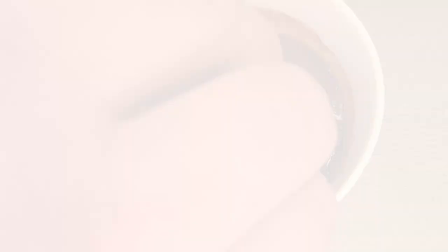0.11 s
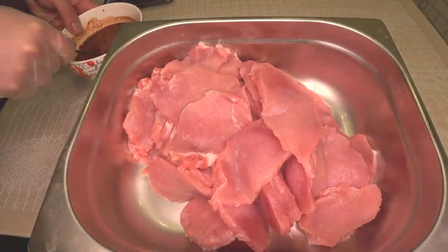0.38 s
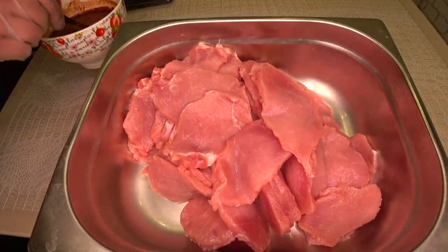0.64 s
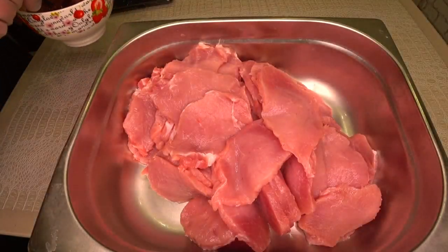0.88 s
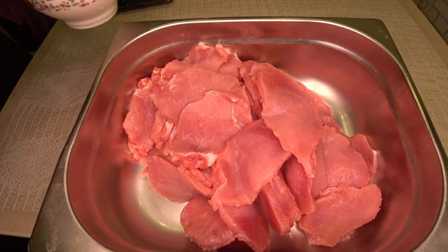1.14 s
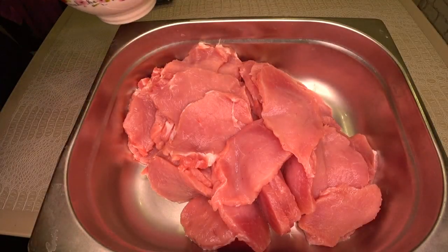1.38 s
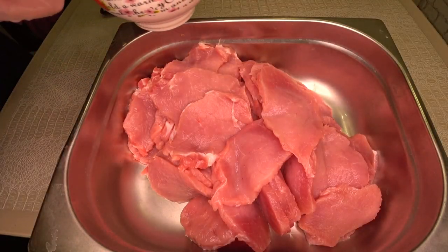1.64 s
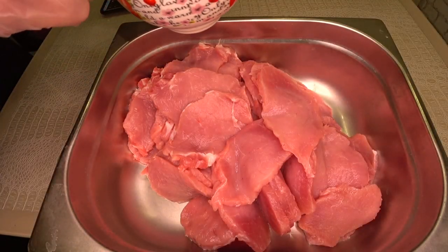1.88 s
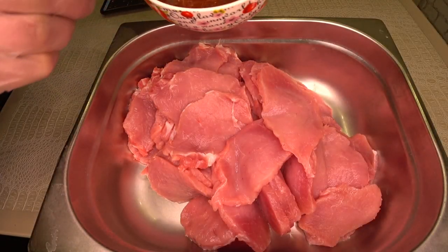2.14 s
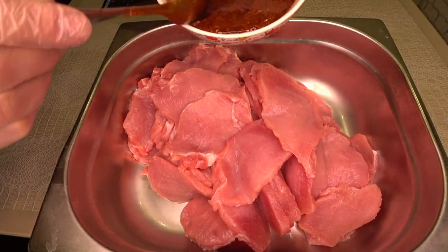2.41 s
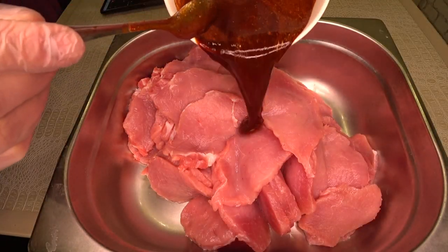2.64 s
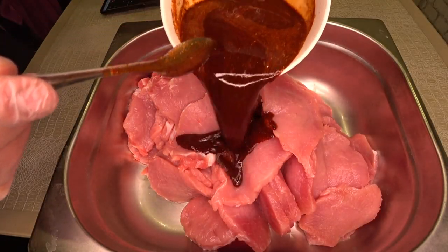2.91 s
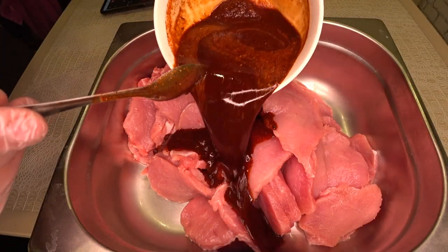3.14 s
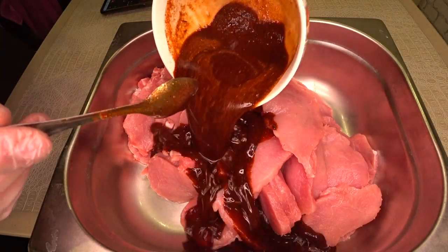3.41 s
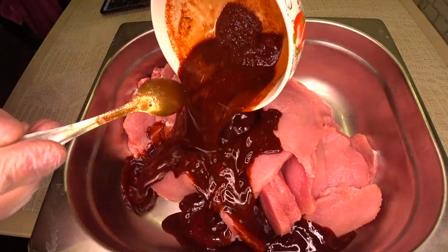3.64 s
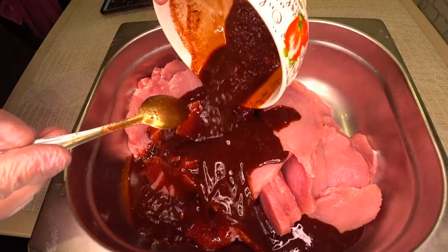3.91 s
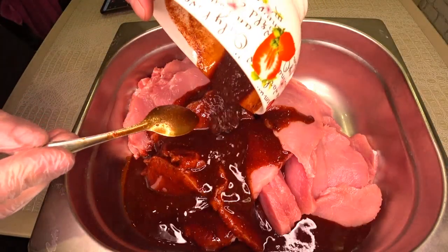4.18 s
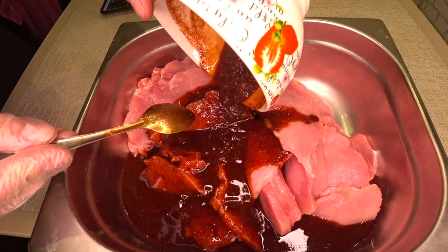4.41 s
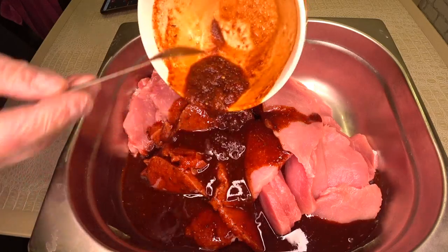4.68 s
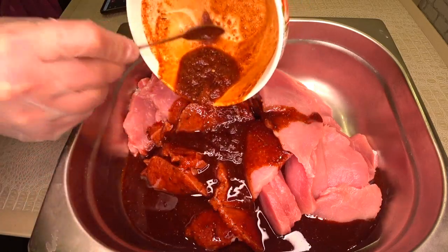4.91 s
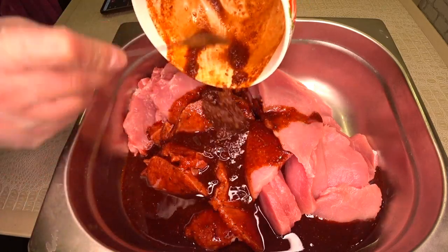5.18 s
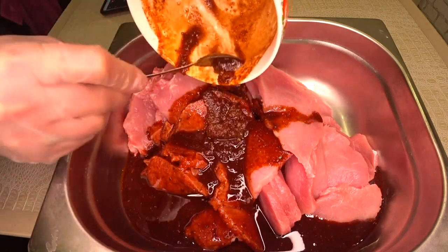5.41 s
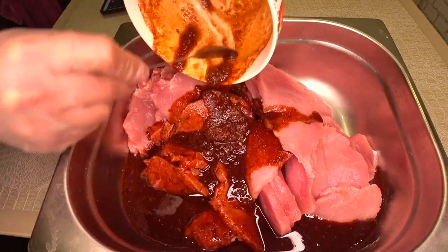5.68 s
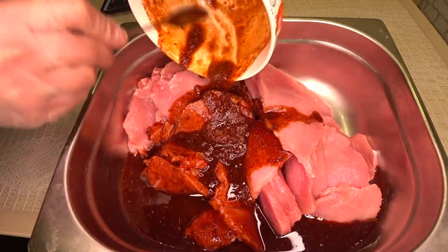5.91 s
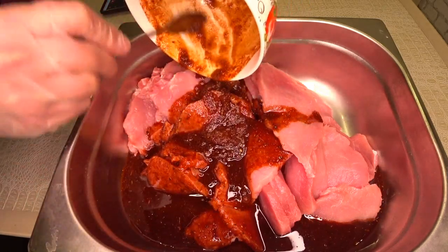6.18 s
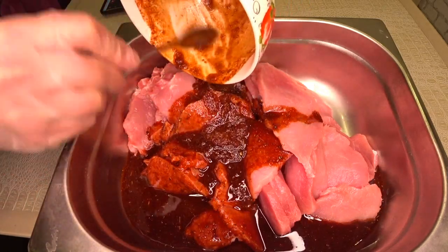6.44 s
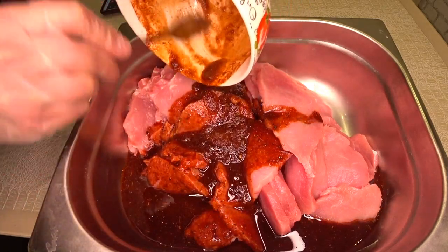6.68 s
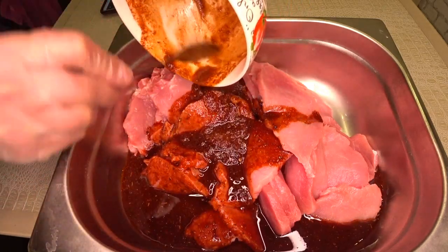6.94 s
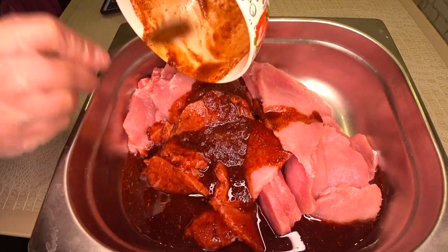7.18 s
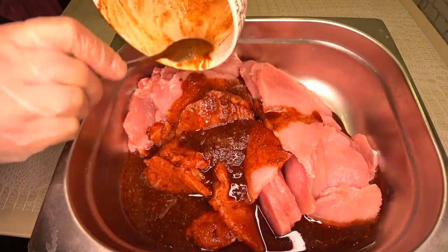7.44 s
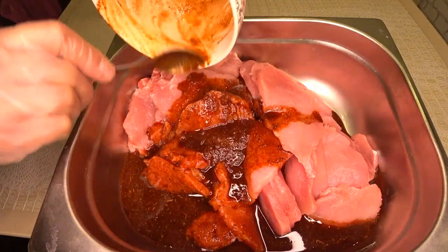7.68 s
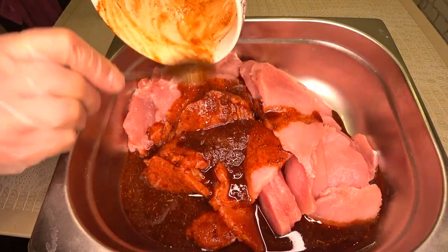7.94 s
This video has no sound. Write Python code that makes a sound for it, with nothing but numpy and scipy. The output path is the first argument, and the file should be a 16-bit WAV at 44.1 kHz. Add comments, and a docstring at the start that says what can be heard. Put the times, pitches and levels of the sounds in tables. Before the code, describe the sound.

Close wet stirring and sauce drips over raw meat, followed by brisk rhythmic spoon scrapes and clinks on a ceramic bowl, with a fan humming behind.

```python
"""A spoon scrapes a ceramic bowl: cracks, decaying modes and rasping slip noise, most strokes opening with a tap.
Before that, a bowl is set down on a kitchen counter (noise clunk, short rings), a spoon stirs it, and thick
sauce pours and drips over meat in a steel tray (gliding bubbles, wet noise, crackle).
A fan (coloured noise, wavering tones) hums in a small hard room; the sound fades out and in at the start."""
import sys
import numpy as np
from scipy import signal
from scipy.fft import rfft, irfft, next_fast_len
from scipy.io import wavfile
from scipy.ndimage import uniform_filter1d

SR = 44100
rng = np.random.default_rng(int(sys.argv[2]) if len(sys.argv) > 2 else 0)


def elevation(decibels):
    """Turn decibel levels (scalar or array-like) into linear amplitude ratios."""
    levels = np.asarray(decibels, float)
    return 10 ** (levels / 20)


def unload_audio(sound):
    """Save the sound as a 16-bit wav file, at the path given as the first command line argument."""
    columns = np.transpose(np.atleast_2d(sound))
    # keep every value between -1 and 1, then stretch to whole-number steps
    steps = np.round(np.clip(columns, -1, 1) * 32767)
    wavfile.write(sys.argv[1], SR, steps.astype(np.int16))


N = 355887


def evened(x):
    """Scales to rms 1."""
    return x / np.sqrt(np.mean(x ** 2) + 1e-20)


def read(points, hz):
    """Reads a (frequency, value) table on a log frequency axis."""
    f, value = np.transpose(points)
    return np.interp(np.log(hz + 1), np.log(f + 1), value)


def curve(rows):
    """Gain over the whole scene from (time, level) rows; -120 dB outside."""
    return elevation(np.interp(np.arange(N) / SR, *np.transpose(rows), -120, -120))


def add(mix, start_s, sound, pan_db=0):
    """Mixes a mono sound into both channels; pan_db is left over right."""
    part = mix[:, round(start_s * SR):][:, :len(sound)]
    part += sound[:part.shape[1]] * elevation(np.array([[pan_db / 2], [-pan_db / 2]]))


def coloured(x, points):
    """Filters by a (frequency, level) spectrum; rms 1."""
    length = x.shape[-1]
    size = next_fast_len(length)
    gain = elevation(read(points, np.fft.rfftfreq(size, 1 / SR)))
    return evened(irfft(rfft(x, size) * gain, size)[..., :length])


def resonate(x, hz, width_hz):
    """One resonance at a fixed or gliding pitch: shift to zero, low-pass, shift back."""
    turn = np.exp(2j * np.pi * np.cumsum(hz * np.ones(len(x))) / SR)
    r = np.exp(-np.pi * width_hz / SR)
    return 2 * (turn * signal.lfilter([1 - r], [1, -r], x / turn)).real


def patchy(x, patch_db):
    """Chance patches of loud and soft over time and pitch; rms 1."""
    z = signal.stft(x, nperseg=128)[2]
    field = uniform_filter1d(rng.standard_normal(z.shape), size=4, axis=0)
    field = uniform_filter1d(field, size=9, axis=1)
    return evened(signal.istft(z * elevation(patch_db * evened(field)), nperseg=128)[1][:len(x)])


def ring(modes, colour_db=0, spread=0.0034, luck_db=2.5):
    """Decaying modes, pitch and level a little off each blow; height and phase shake most at first."""
    hz, db, t60_s = np.transpose(modes)[:, :, None]
    t = np.arange(SR // 2) / SR
    chance = rng.standard_normal((len(modes), 2))
    turns = hz * (1 + spread * chance[:, :1]) * t
    shake = .08 + .36 * np.exp(-t / .06)
    smooth = SR // 100  # 10 ms
    wander = uniform_filter1d(rng.standard_normal((2, len(modes), len(t))), size=smooth)
    height, phase = shake * wander * np.sqrt(smooth)
    decay = elevation(db + colour_db + luck_db * chance[:, 1:] - 60 * t / t60_s)
    return (decay * (1 + height) * np.sin(2 * np.pi * turns + phase)).sum(0)


def crack(t60_s, low_db, corner_hz=2200, rise_s=0.00076):
    """Contact noise: a decaying burst above the corner, peak 1, plus one blunt click below it."""
    t = np.arange(2000) / SR
    burst = rng.standard_normal(len(t)) * elevation(-60 * t / t60_s) * np.minimum(t / rise_s, 1)
    click = np.pad(np.hanning(20), (100, len(t) - 120))
    high = signal.sosfilt(signal.butter(2, corner_hz, "high", fs=SR, output="sos"), burst)
    low = signal.sosfilt(signal.butter(2, corner_hz, "low", fs=SR, output="sos"), click)
    low = low - uniform_filter1d(low, size=85)  # removes deep bass
    return high / abs(high).max() + elevation(low_db) * low / abs(low).max()


def bubble(hz, cycles, rise=0.023):
    """A few cycles that swell, die away and glide upward as the pocket shrinks."""
    u = np.arange(1500) / SR * hz / max(cycles, 1)
    tone = np.sin(2 * np.pi * cycles * u * (1 + rise * u))
    return tone * np.tanh(22.0 * u) * np.exp(-3.2 * u ** 2.03)


def crackle(per_s, scatter_db):
    """Sparse clicks of chance sign, a few large; rms 1."""
    size = elevation(scatter_db * np.minimum(rng.exponential(1, N), 4)) * rng.standard_normal(N)
    return evened(size * (rng.random(N) < per_s / SR))


def wet_noise(length_s, db, start_hz, end_hz, width_hz, tone=0):
    """Patchy noise plus optional sine in a gliding resonance that opens fast, sags and closes."""
    u = np.linspace(0, 1, round(length_s * SR))
    hz = start_hz + (end_hz - start_hz) * u
    pocket = resonate(resonate(rng.standard_normal(len(u)), hz, width_hz), hz, width_hz)
    pocket = patchy(pocket, 5.3) + tone * np.sin(2 * np.pi * np.cumsum(hz) / SR)
    rise_share, fall_share, sag_db = 0.062, 0.11, -5.5
    shape = np.minimum(np.minimum(u / rise_share, (1 - u) / fall_share), 1)
    return elevation(db + sag_db * u) * evened(pocket) * shape


# Fan air spectrum: (frequency [Hz], relative density [dB])
AIR_SPECTRUM = [(30, -23), (120, -36), (200, -8.5), (450, -8.5), (670, -14.5), (1100, -17), (2050, -19),
                (2400, -25), (5000, -26), (10500, -32.5)]
# Left-right likeness of the air: (frequency [Hz], correlation [-1..1])
AIR_LIKENESS = [(60, 0.32), (300, 0.9), (900, 0.12), (11800, 0.35)]
# Fan tones: (frequency [Hz], rms level [dB], waver width [Hz])
FAN_TONES = [(48.5, -55, .5), (97, -63, 2.), (157, -51, 9.), (243, -63, 6.), (455, -65, 8.),
             (1319, -73, 12.)]


def fan():
    """Broad air noise, partly shared by the channels, and motor tones wavering in phase and height."""
    air_db = -50.5
    shared, other = rfft(rng.standard_normal((2, N)))
    same = np.clip(read(AIR_LIKENESS, np.fft.rfftfreq(N, 1 / SR)), -1, 1)
    air = irfft([shared, same * shared + np.sqrt(1 - same ** 2) * other], N)
    hum, t = np.zeros(N), np.arange(N) / SR
    for hz, db, width_hz in FAN_TONES:
        pole = np.exp(-np.pi * width_hz / SR)
        real, imag = signal.lfilter([1], [1, -pole], rng.standard_normal((2, N)))
        steady = 2.7 / width_hz ** .7
        wander = evened(real) + 1j * evened(imag) + steady
        hum += elevation(db) * evened((wander * np.exp(2j * np.pi * hz * t)).real)
    return elevation(air_db) * coloured(air, AIR_SPECTRUM) + hum


# Short ticks, mostly wet, one a faint spoon tap on the bowl: (time [s], level [dB], frequency [Hz])
TICK_EVENTS = [(0.1147, -9, 3950), (1.0202, -12.5, 4370), (1.197, -15.5, 2920), (1.3823, -17, 1410),
               (1.816, -17, 5400), (1.8424, -17, 5500), (2.3505, -5, 5230), (2.775, -27.5, 6980),
               (2.997, -18, 9700), (3.036, -21, 10100), (3.055, -15.5, 5130), (3.085, -18, 11200),
               (3.118, -16.5, 6200), (3.1973, -19, 6700), (3.3503, -27, 5060), (3.3866, -25, 7000),
               (3.4532, -18, 7500), (3.576, -19, 4030), (3.649, -20, 6430), (3.714, -26, 6000),
               (3.8004, -11.5, 5260), (3.819, -16, 6840), (3.854, -14.5, 4800), (3.891, -8.5, 5650),
               (3.9528, -11, 8040), (4.4532, -25.5, 7300), (5.267, -25, 7000)]


def ticks():
    """Short ticks, mostly wet: a brief bubble over a crack narrowed by a resonance."""
    mix = np.zeros((2, N))
    for s, db, hz in TICK_EVENTS:
        snap = resonate(crack(0.019, -53, 1050), hz, 1600)
        snap = snap[:1500] / abs(snap).max()
        add(mix, s, elevation(db) * (0.23 * bubble(hz, 8.4) + 0.33 * snap))
    return mix


# Room decay: (frequency [Hz], t60 [s])
ROOM_T60 = [(300, 0.035), (1000, 0.39), (3000, 0.29), (11000, 0.16)]


def kitchen(x):
    """Small hard room: sparse echoes of random sign, each band dying at its own speed."""
    taps = np.zeros((2, SR // 2))
    grid = np.arange(80, SR // 2 - 20, 20)  # one echo per 20 samples
    at = grid + rng.integers(0, 20, (2, len(grid)))
    np.put_along_axis(taps, at, rng.choice([-1., 1.], at.shape), 1)
    taps[1] = 0.5 * taps[0] + 1.37 * taps[1]  # close microphones share some echoes
    hz, t, z = signal.stft(taps, SR, nperseg=256)
    tail = signal.istft(z * elevation(-60 * t / read(ROOM_T60, hz)[:, None]), SR, nperseg=256)[1]
    return signal.fftconvolve(x, tail / np.linalg.norm(tail[0]), axes=1)[:, :N]


# Clunk spectrum: (frequency [Hz], relative density [dB])
CLUNK_SPECTRUM = [(150, -34), (350, -28), (700, -8), (976, -30.5), (1700, -10), (2600, -19), (7000, -17),
                  (11000, -39)]
# Counter modes: (frequency [Hz], relative level [dB], t60 [s])
COUNTER_MODES = [(424, -5, 0.37), (673, -5.5, 0.27), (1307, -11, 0.22), (1714, -1.5, 0.2),
                 (1946, -16, 0.13), (2390, -8, 0.28), (4430, 3, .07)]


def set_down():
    """The full bowl meets the counter: a dense noise clunk with a few short rings."""
    start_s, pan_db = .524, 2.5
    clunk_db, clunk_t60_s, ring_db = -15, 0.15, -23
    mix, t = np.zeros((2, N)), np.arange(SR // 3) / SR
    clunk = patchy(coloured(rng.standard_normal(len(t)), CLUNK_SPECTRUM), 4.)
    clunk = clunk * elevation(-60 * t / clunk_t60_s) * np.minimum(t / 0.0034, 1)
    add(mix, start_s, elevation(clunk_db) * clunk, pan_db)
    add(mix, start_s, elevation(ring_db) * ring(COUNTER_MODES, spread=0, luck_db=3.0), pan_db)
    return mix


# Wet crackle while stirring: (time [s], level [dB])
STIR_LEVEL = [(1.0, -57), (1.25, -58.5), (1.9, -48.5), (2.0, -68)]
# Wet crackle while pouring: (time [s], level [dB])
POUR_LEVEL = [(2.97, -48), (3.0, -51.5), (3.9, -61), (4.02, -67)]


def wet_crackle():
    """Tiny bubbles of twelve sizes burst at random while stirring and pouring."""
    fizz = np.zeros(N)
    for hz in np.geomspace(1400, 10000, 12):
        bursts = crackle(per_s=160, scatter_db=3)
        fizz += signal.oaconvolve(bursts, bubble(hz, 9.7, 0.048))[:N]
    return evened(fizz) * (curve(STIR_LEVEL) + curve(POUR_LEVEL))


# Bubbles, drips and wet knocks: (time [s], level [dB], start frequency [Hz])
PLOP_EVENTS = [(1.019, -27, 1410), (1.384, -23.5, 820), (1.409, -25.5, 3230), (1.608, -24.5, 3270),
               (1.843, -13.5, 3320), (2.352, -10.5, 3090), (2.353, -19, 1456), (2.991, -28, 1660),
               (3.037, -32.5, 1410), (3.055, -26.5, 1640), (3.078, -27, 1720), (3.1, -29.5, 1570),
               (3.111, -29.5, 1550), (3.1, -26.5, 3760), (3.213, -36.5, 2970), (3.246, -33, 4030),
               (3.288, -33.5, 1720), (3.423, -25, 5950), (3.441, -24, 1560), (3.455, -35, 1000),
               (3.471, -31.5, 1070), (3.59, -36.5, 3260), (3.772, -34, 4200), (3.556, -33.5, 4040),
               (3.565, -20.5, 6350), (3.573, -36, 1390), (3.6, -35.5, 1486), (3.597, -25.5, 3950),
               (3.721, -34.5, 2870), (3.738, -24, 4500), (3.804, -27.5, 1590), (3.854, -40, 810),
               (3.868, -36, 864), (3.891, -14, 3360), (3.941, -22, 3520), (4.136, -38, 1520),
               (4.301, -39, 1570), (4.421, -40, 1760), (4.642, -39, 1870)]


def plops():
    """Each plop is a rising bubble with a very short crack at its onset."""
    mix = np.zeros((2, N))
    for s, db, hz in PLOP_EVENTS:
        add(mix, s, elevation(db) * bubble(hz, cycles=14.2))
        add(mix, s, elevation(db - 4.0) * crack(0.0037, -23, 650))
    return mix


# Wet rubbing and the noisy body of a wet knock: (time [s], length [s], level [dB], frequency [Hz], width [Hz])
WET_BURST_EVENTS = [(1.02, 0.081, -47.5, 3920, 5000), (1.19, 0.16, -49, 3400, 3900),
                    (1.528, 0.088, -45.5, 4800, 3800), (2.351, 0.15, -44, 4170, 4000),
                    (3.799, 0.028, -35, 2670, 1540)]


def wet_bursts():
    """Wet rubbing and the noisy body of a wet knock: patchy noise in a wide fixed resonance."""
    mix = np.zeros((2, N))
    for s, length_s, db, hz, width_hz in WET_BURST_EVENTS:
        add(mix, s, wet_noise(length_s, db, hz, hz, width_hz))
    return mix


# Gurgling air pockets: (time [s], length [s], level [dB], start frequency [Hz], end frequency [Hz])
GURGLE_EVENTS = [(1.379, 0.09, -29, 706, 947), (1.412, 0.032, -31, 956, 1356),
                 (1.68, 0.053, -45, 2676, 2600), (1.795, 0.095, -38.5, 830, 1180),
                 (2.354, 0.13, -36.5, 1490, 1390), (2.355, 0.17, -43.5, 1090, 1158),
                 (3.886, 0.09, -41.5, 3260, 4310)]


def gurgles():
    """Air pockets gurgle: noise and a sine glide together in one resonance."""
    mix = np.zeros((2, N))
    for s, length_s, db, start_hz, end_hz in GURGLE_EVENTS:
        width_hz = 0.26 * start_hz
        add(mix, s, wet_noise(length_s, db, start_hz, end_hz, width_hz, tone=1.0))
    return mix


# Closing pockets: (time [s], level [dB], start frequency [Hz], rise factor)
CHIRP_EVENTS = [(3.321, -37, 2670, 0.37), (3.352, -34.5, 2600, 0.35), (3.441, -35, 2660, 0.65),
                (3.47, -35.5, 2360, 0.22), (3.789, -36, 1900, .6)]


def chirps():
    """Closing pockets chirp upward fast: bubbles of many cycles and a strong glide."""
    mix = np.zeros((2, N))
    for s, db, hz, rise in CHIRP_EVENTS:
        add(mix, s, elevation(db) * bubble(hz, 26.7, rise))
    return mix


# Sauce position: (time [s], left over right [dB])
SAUCE_PAN = [(1.4, 2.5), (1.85, 2.5), (2.35, 0.5), (3., 1.5)]


def sauce_and_ticks():
    """The sauce sounds and all short ticks, moved together between the channels."""
    wet = ticks() + wet_crackle() + plops() + wet_bursts() + gurgles() + chirps()
    side_db = np.interp(np.arange(N) / SR, *np.transpose(SAUCE_PAN)) / 2
    return wet * elevation(np.array([side_db, -side_db]))


# Clean empty bowl: (frequency [Hz], relative level [dB], t60 [s])
BOWL_MODES = [(1206, -23, 0.26), (2380, -34, 0.038), (3095, -10, 0.19), (3365, -14, 0.08),
              (5590, -10, 0.057), (5570, -5, 0.056), (8580, -21, 0.11), (10910, -24, 0.032)]


def bowl_at(s):
    """Bowl modes, lower and more damped while sauce still clings to the wall."""
    clean_s, drop_per_s, damping_per_s = 8.7, 0.002, 0.12
    left_s = max(clean_s - s, 0)
    return np.array(BOWL_MODES) * [1 - drop_per_s * left_s, 1, 1 / (1 + damping_per_s * left_s)]


# Soft ringing swells, taps' bright bursts and tails, and snags along the stroke:
# (time [s], level [dB], frequency [Hz])
SWELL_EVENTS = [(4.832, -2.5, 5250), (4.917, -22, 3480), (4.989, -22.5, 3470), (5.144, -27, 3100),
                (5.408, -16, 3230), (5.657, -6, 3340), (5.7122, -25, 5200), (5.9286, -5, 9900),
                (6.0343, -10.5, 5400), (6.213, -12, 5200), (6.276, -10.5, 3000), (6.29, -31, 3060),
                (6.4713, -14.5, 3970), (6.4997, -13.5, 3230), (6.521, -13, 3500), (6.7859, -17.5, 3013),
                (6.9595, -11.5, 3600), (6.988, -18, 5600), (7.008, -8, 3540), (7.429, -11, 3240),
                (7.471, -10, 3365), (7.479, -15, 5580), (7.7151, -8, 5575), (7.722, -16, 3095)]


def ringing_swells():
    """Taps' bright bursts and tails, and snags: soft chatter and mainly the bowl modes near its pitch."""
    lead_s, chatter_db, ring_db = .004, -23.5, 5.5
    pick_db, pick_octaves = 13, .1  # extra loss for modes away from the chatter
    mix, mode_hz = np.zeros((2, N)), np.array(BOWL_MODES)[:, :1]
    swell = np.minimum(np.arange(SR // 2) / SR / 0.0061, 1)
    for s, db, hz in SWELL_EVENTS:
        chatter = rng.standard_normal(800) * signal.windows.hann(800) ** 7.5
        chatter = evened(resonate(chatter, hz, 270)) + 0.49 * np.gradient(chatter)
        add(mix, s - lead_s, elevation(db + chatter_db) * chatter)
        apart = abs(np.log2(mode_hz / hz))  # octaves
        colour_db = -6. * apart - pick_db * np.minimum(apart / pick_octaves, 1)
        add(mix, s - lead_s, elevation(db + ring_db) * swell * ring(bowl_at(s), colour_db))
    return mix


# Spoon taps: (time [s], crack level [dB], crack low part re crack [dB], ring re crack [dB],
#              ring tilt [dB per octave])
TAP_EVENTS = [(4.831, -7.5, -39, -22, -13.5), (4.9027, -12, -12.5, -24, -18), (5.3031, -5, -12, -28, -6),
              (5.615, -14.5, 2, -30, -4), (5.655, -3.5, -36, -17, -4.5), (5.902, -6, -18, -3, 3),
              (6.177, -8, -13.5, -27, 19), (6.4186, -4.5, -10.5, -35.5, -13), (6.6606, -9, -20, -29, 21),
              (6.9194, -8, -16.5, -40, -0.5), (7.1593, -8.5, -49, -3.5, 7), (7.3999, -4.5, -54, -6.5, -0.5),
              (7.661, -4.5, -44, -5, -1), (7.9179, -6, -42, -5, -2)]
# Tap position: (time [s], left over right [dB])
TAP_PAN = [(5.3, 0.3), (7.7, 2)]


def taps():
    """The spoon taps the bowl: a crack, and the bowl's modes tilted per blow."""
    tilt_hz = 3200
    mix, mode_hz = np.zeros((2, N)), np.array(BOWL_MODES)[:, :1]
    octaves = np.clip(np.log2(mode_hz / tilt_hz), -1.4, .8)
    for s, db, low_db, ring_db, tilt_db in TAP_EVENTS:
        pan_db = np.interp(s, *np.transpose(TAP_PAN))
        add(mix, s, elevation(db) * crack(0.021, low_db, rise_s=0.00051), pan_db)
        add(mix, s, elevation(db + ring_db) * ring(bowl_at(s), tilt_db * octaves), pan_db)
    return mix


def stroke_level(db, length, top, first_db, last_db):
    """Level of one stroke: db at the share top, first_db and last_db relative to it at the ends."""
    u = np.linspace(0, 1, length)
    bend_db = np.interp(u, (0, np.clip(top, .02, .98), 1), (first_db, 0, last_db))
    return elevation(db + bend_db) * signal.windows.tukey(length, .2)


# Spoon dragged along the glaze: (start [s], length [s], hiss level [dB], ring drive [dB],
#                                 hardest press [share of length])
STROKE_EVENTS = [(4.854, 0.2, -35.5, -51, 0.47), (5.019, 0.14, -45, -25.5, 1),
                 (5.326, 0.19, -34, -24, 0.45), (5.665, 0.11, -33.5, -25.5, 0.37),
                 (5.916, 0.14, -28, -19, 0.14), (6.193, 0.12, -35, -18, 0.83),
                 (6.431, 0.13, -37, -25.5, 0.63), (6.673, 0.12, -34, -19.5, 1),
                 (6.944, .11, -31, -33, 0.24), (7.175, 0.16, -33, -23, 0.5),
                 (7.418, 0.11, -43, -27.5, 0.71), (7.674, 0.12, -32, -21, 0.11),
                 (7.928, 0.12, -27.5, -18, 0.12)]
# Rasp spectrum: (frequency [Hz], relative density [dB])
RASP_SPECTRUM = [(400, -22), (1200, 6.5), (2400, -4.5), (3600, -13.5), (4500, 4), (6500, 4), (9000, -3),
                 (10800, 2)]


def strokes():
    """The dragged edge slips unevenly: it rasps, sounds the air by the wall and keeps the bowl ringing."""
    hollow_start_hz, hollow_end_hz, hollow_width_hz, hollow_db = 4100, 3297, 304, -17.5
    body_db, pressed = -9.5, .85  # pressed: share of the ring time left under the spoon
    mix = np.zeros((2, N))
    for s, length_s, hiss_db, ring_db, top in STROKE_EVENTS:
        length = round(length_s * SR)
        hiss = stroke_level(hiss_db, length, top, 0, -18)
        sing = stroke_level(ring_db, length, top, -15, -12.5)
        grip = elevation(4.5 * evened(uniform_filter1d(rng.standard_normal(length), 130)))
        slips = grip * rng.standard_normal(length) * elevation(2.57 * rng.exponential(1, length))
        slips = evened(slips)
        # air between spoon and wall; sinks as the spoon nears the rim
        hz = np.geomspace(hollow_start_hz * rng.uniform(.9, 1.1), hollow_end_hz, length)
        hollow = evened(resonate(resonate(slips, hz, hollow_width_hz), hz, hollow_width_hz))
        rasp = patchy(coloured(slips, RASP_SPECTRUM), 5.2)
        add(mix, s, hiss * rasp + elevation(hollow_db) * sing * hollow)
        body = evened(ring(bowl_at(s) * [1, 1, pressed])) / np.sqrt(SR // 2)  # unit energy
        add(mix, s, elevation(body_db) * signal.fftconvolve(sing * slips, body))
    return mix


# Fade out and in: (time [s], level [dB])
FADE_LEVEL = [(0, -8), (.1, -17), (.175, -38), (.2, -25), (.35, -9), (.45, -4), (.6, 0)]


def scene():
    """Near sounds, their room echo and the fan, all under the fade."""
    wet, clank = sauce_and_ticks(), set_down()
    bowl = ringing_swells() + taps() + strokes()
    echo = kitchen(elevation(-10.5) * wet + elevation(-10.0) * bowl + elevation(-5.5) * clank)
    fade = elevation(np.interp(np.arange(N) / SR, *np.transpose(FADE_LEVEL)))
    return (wet + bowl + clank + echo + fan()) * fade


def band_limit(x):
    """A steep low-pass at the top of the band."""
    return signal.sosfilt(signal.butter(12, 12430, fs=SR, output="sos"), x)


def record(dry):
    """Steep band limit; the band above it opens only while it is loud."""
    edge_hz, top_db, gate_db = 11150, -9.5, -43
    band = signal.firwin(401, edge_hz, window=("kaiser", 6), fs=SR)
    skirt = signal.firwin(41, 12000, window=("kaiser", 3.), fs=SR)
    low = signal.oaconvolve(dry, band[None], "same")
    wide = signal.oaconvolve(dry, skirt[None], "same")
    top = signal.sosfilt(signal.butter(6, edge_hz, "high", fs=SR, output="sos"), wide)
    power = abs(uniform_filter1d(top ** 2, size=256))
    gate = (power / (power + elevation(gate_db) ** 2)) ** 2
    mix = low + elevation(top_db) * top * gate
    return band_limit(mix)


dry = scene()
out = record(dry)
unload_audio(out)
```